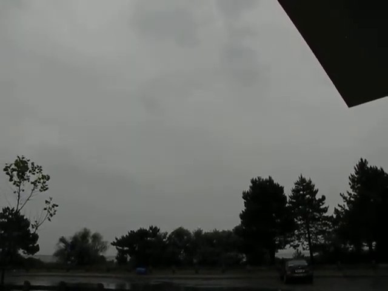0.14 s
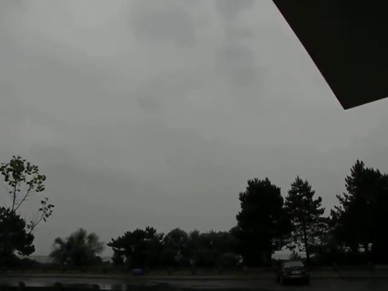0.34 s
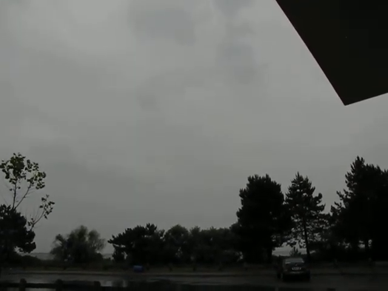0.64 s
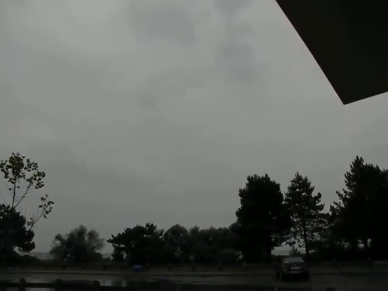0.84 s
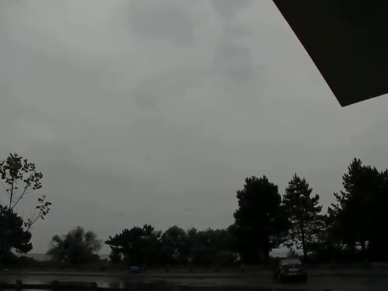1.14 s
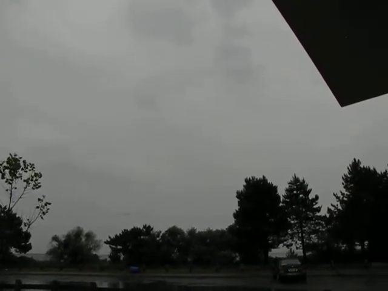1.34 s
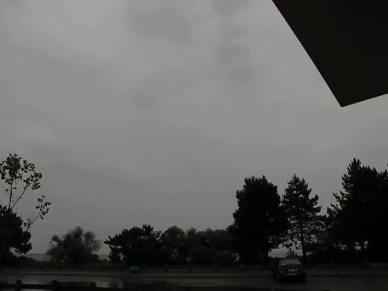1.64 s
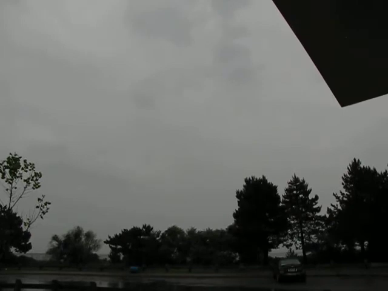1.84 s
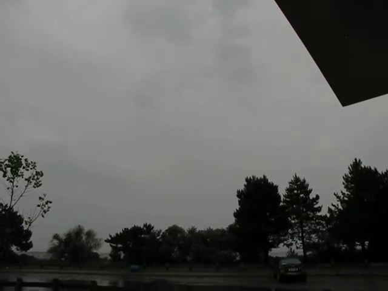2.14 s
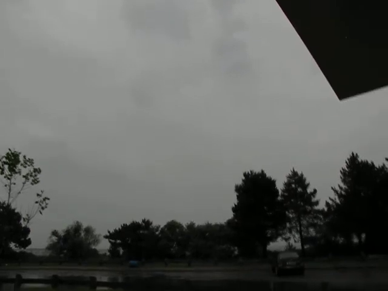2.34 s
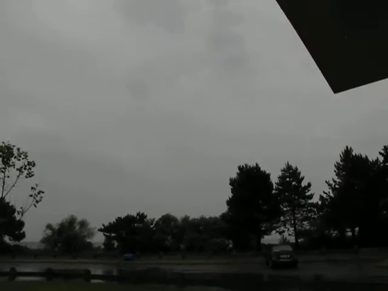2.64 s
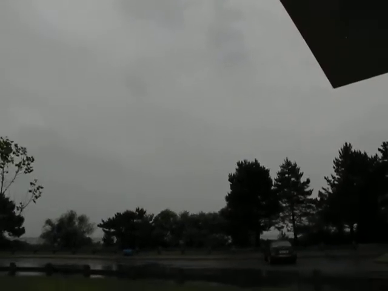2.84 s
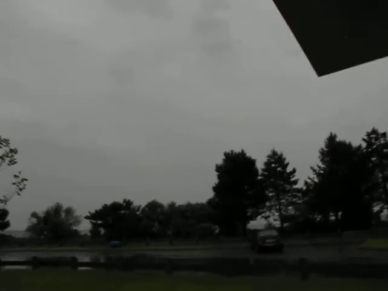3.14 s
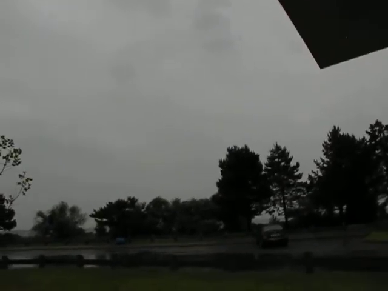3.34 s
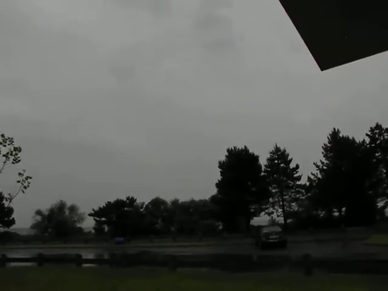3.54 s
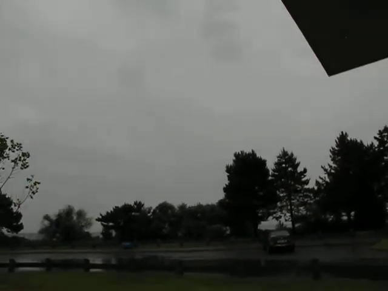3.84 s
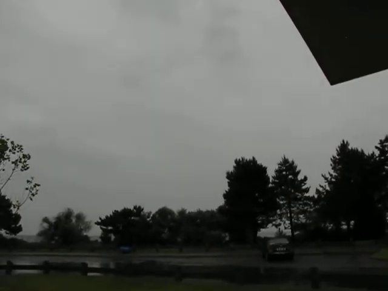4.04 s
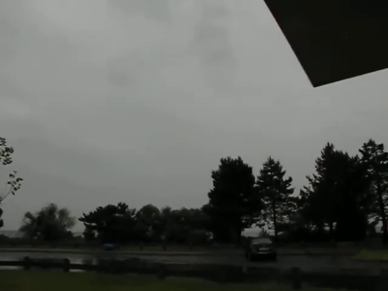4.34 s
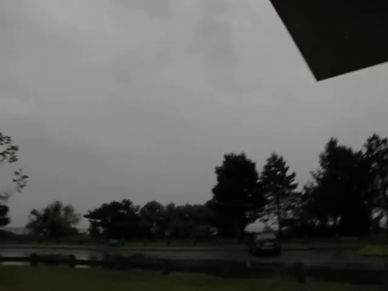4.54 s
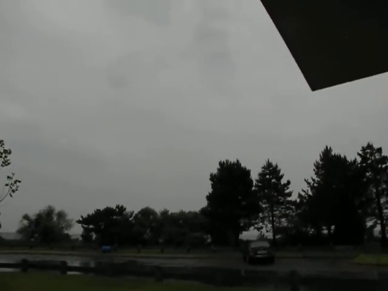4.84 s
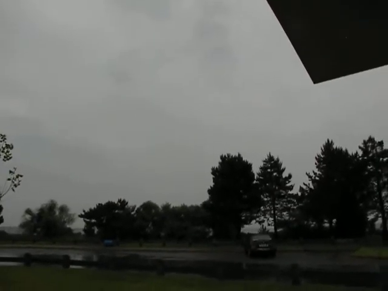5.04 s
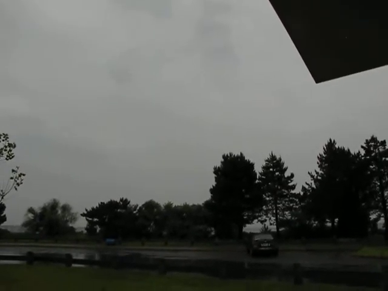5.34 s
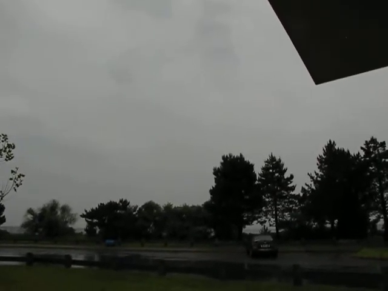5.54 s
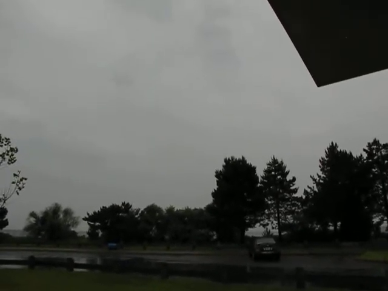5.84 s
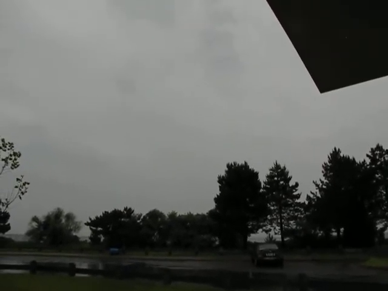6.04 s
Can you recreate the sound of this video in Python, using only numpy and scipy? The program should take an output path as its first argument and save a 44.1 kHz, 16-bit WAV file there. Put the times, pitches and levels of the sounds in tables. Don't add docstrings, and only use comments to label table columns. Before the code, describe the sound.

Throughout about six seconds, deep distant thunder rolls and wavers, booming softly beneath a porch roof, over a quiet wash and hiss of light rain with tiny drops ticking on the roof edge. At 1.0 s a single rough sparrow chirp sounds; around 1.7-2.0 s wet leaves rustle faintly. From 2.25 to 3.1 s the camera's plastic case slips in the hand: dry clicks, knocks and short finger rubs, very close, jumping left and right, strongest near 2.4 and 2.6 s. From 3.0 to 4.3 s a thrush whistles clear, gliding notes echoing off trees, with stray clicks. Finger rubbing at 4.2-4.5 s leads to a hard hollow tap at 4.6 s and a sharp left-side crack at 4.9 s, with another whistle between. Sparrows chirp around 5.1-5.4 s, a faint whistle follows, and a nearer thunder peal surges from 5.5 s, peaking near 5.95 s and starting to die.

```python
import sys
import numpy as np
from scipy import signal
from scipy.fft import rfft, irfft, next_fast_len
from scipy.io import wavfile
from scipy.ndimage import uniform_filter1d

SR = 44100
rng = np.random.default_rng(int(sys.argv[2]) if len(sys.argv) > 2 else 0)


def gain_from_db(level_db):
    decades = np.asarray(level_db, float) / 20
    return 10 ** decades


def unload_wav(signal):
    wavfile.write(
        sys.argv[1],
        SR,
        np.round(np.clip(np.atleast_2d(signal).T, -1, 1) * 32767).astype(np.int16),
    )


N = 272538

# t/s, level/dB
RAIN_LEVEL = [(0.0, -60), (2.01, -59.5), (2.46, -58.5), (3.27, -63), (4.11, -58.5), (4.25, -58),
              (4.44, -55), (4.66, -61.5), (4.77, -59.5), (4.89, -64), (5.09, -65.5), (5.3, -62.5),
              (6.18, -60)]
# f/Hz, density/(dB per Hz)
WASH_TONE = [(140, -4.5), (230, -4.5), (271, -8), (623, -7), (785, -7), (1550, -7.5), (2470, -9),
             (3200, -12.5), (3770, -13), (6000, -29), (7800, -44), (13200, -120)]
HISS_TONE = [(2650, -13), (4500, -1), (6460, -5.5), (11000, -12), (12900, -15.5), (15200, -18.5),
             (15900, -21), (16300, -60)]
# f/Hz, left-right likeness/1
PORT_LIKENESS = [(60, 0.99), (130, 0.98), (290, 0.84), (640, 0.74), (1410, 0.65), (3100, 0.06),
                 (6820, -0.27), (15000, 0.03)]
# f/Hz, left-right level/dB
PORT_LEAN = [(60, 1.0), (110, 0.5), (200, 1.0), (380, 0.5), (700, 0.0), (1290, 0.0), (2380, -0.5),
             (4400, 2.5), (8120, 2.0), (15000, 1.0)]
# t/s, peak/dB, body/dB
DROPS = [(0.2617, -47, -10), (0.5397, -50, -9), (0.7337, -50, -9), (0.854, -50, -11), (0.9155, -49, -1),
         (1.3478, -49, -9), (1.6526, -44.5, 6), (1.917, -48, -9), (2.0994, -54, -4), (3.0145, -50, -3),
         (3.1847, -53, -14), (3.3144, -51, -11), (3.4521, -56, -18), (3.497, -47.5, 7), (3.6651, -51, -10),
         (3.907, -45, -16), (4.0008, -55, 7), (4.4954, -52, 8), (4.532, -51, 16), (4.5511, -55, 6),
         (4.56, -56, 18), (5.047, -50, 7), (5.22, -50, -6), (5.6101, -46.5, -7), (5.689, -52.5, 14.5),
         (5.7608, -53, -6), (6.0122, -57, -10), (6.1389, -52, -12), (.2455, -53, -15), (.283, -52, -15),
         (.746, -51, -12), (1.084, -55, -10), (1.142, -53, -15), (1.39, -55, -12), (4.243, -50, 8),
         (4.571, -58, 12)]
# t/s, peak/dB
GUSTS = [
    (1.64, -59),
    (1.71, -46),
    (1.894, -44),
    (1.976, -43),
    (3.5, -46),
    (5.266, -46),
]
# start/s, length/s, first f/Hz, last f/Hz,
# peak/dB
THRUSH_NOTES = [(3.035, 0.07, 3387, 3180, -37), (3.098, 0.15, 2950, 2225, -44),
                (3.206, 0.13, 2190, 2165, -50), (3.538, 0.028, 2130, 2200, -48),
                (3.565, 0.17, 3080, 2375, -35), (3.726, 0.052, 2687, 2714, -46),
                (3.734, 0.062, 2320, 1960, -43.5), (4.076, 0.06, 2590, 2474, -38),
                (4.119, 0.061, 2898, 2870, -30.5), (4.203, 0.042, 2511, 2468, -33),
                (4.243, .035, 2440, 1940, -43), (4.709, 0.015, 2120, 2170, -48),
                (4.725, .03, 1990, 2400, -48), (3.091, .02, 2500, 2900, -45),
                (3.558, 0.015, 2180, 3300, -45), (4.732, .15, 3167, 2370, -34),
                (4.895, 0.037, 2900, 2500, -50), (4.902, 0.05, 2370, 1940, -50.5),
                (4.192, 0.013, 2950, 4300, -42), (4.295, .04, 3540, 4700, -48),
                (5.31, .02, 4400, 7050, -50), (5.46, 0.11, 2244, 2600, -43),
                (5.582, 0.077, 2290, 2012, -47)]
# start/s, climb/s, fall/s, top f/Hz, peak/dB
SPARROW_CHIRPS = [
    (1.008, 0.0079, 0.045, 4260, -39),
    (4.801, 0.017, 0.04, 4090, -46),
    (5.11, .012, .075, 4645, -39.5),
    (5.322, .028, 0.036, 3990, -38.5),
    (5.382, 0.024, 0.04, 3980, -40),
]
# f/Hz, t60/s
TREE_DECAY = [(1500, 0.42), (3000, 0.29), (6000, 0.15)]
# delay/s, level/dB
WALL_ECHOES = [(.011, -10), (.021, -15), (.036, -16), (.055, -15), (.1, -22), (.17, -18), (.21, -24)]
# t/s, ring peak/dB, sharpness/dB, left-right/dB
SLIPS = [(2.246, -43, 3, -2), (2.301, -23.5, -9, -3), (2.318, -45, 2.5, 2), (2.3745, -17.5, 1.5, -11),
         (2.392, -18, -12, 0), (2.546, -36, -9, -9), (2.58, -33.5, 1.5, -8), (2.6025, -12, -6, 8.5),
         (2.616, -36, 3, -16), (2.632, -34.5, -2, -12), (2.81, -23.5, 7, 6), (2.868, -20.5, -4, 5.5),
         (2.881, -19, -3, 7.5), (2.9034, -24.5, 4.5, 13), (2.92, -22.5, -2.5, 6), (2.965, -29, 1.5, 8),
         (3.046, -30, 2.5, 9.5), (3.114, -37.5, -2, 12), (3.17, -41, -6, -15), (3.739, -26.5, 4, 8),
         (3.873, -38, -2.5, 3), (4.026, -38.5, 5, -4), (4.221, -36.5, -10, -13), (4.262, -40.5, 4.5, -16),
         (4.452, -36, 0, 11), (4.6027, -20.5, -11, 1.5), (4.66, -27, -0.5, 1.5), (4.724, -34, 0, -3),
         (4.893, -30.5, 12.5, 3), (5.577, -56, 15.5, -4), (2.3952, -19, -15, -0.5), (2.583, -34, 1, -7),
         (2.6045, -13.5, -4, -4), (2.6062, -22, -7, 2), (2.609, -37, -2, 0), (2.6185, -38, 6, -8),
         (4.592, -39, -12, -1), (2.832, -36, -3, 5), (2.8703, -33, -7, 7), (2.879, -27, -7, 3),
         (2.885, -28, -6, 3), (2.956, -40, -4, 7), (4.88, -36.5, -3, 1)]
# t/s, ring f/Hz, ring t60/s, seam level/dB
GRIP = [(2.246, 1080, 0.028, 4), (2.3, 1080, 0.021, 0), (2.318, 1080, .02, 3.5), (2.3745, 900, .011, -7.5),
        (2.392, 900, 0.01, -3), (2.58, 1000, 0.013, -4), (2.6025, 1105, 0.011, -6),
        (2.81, 1090, 0.017, -2.5), (2.87, 1070, 0.023, -1), (2.9034, 1065, 0.021, 0),
        (3.046, 1060, 0.018, -1), (3.74, 1100, 0.014, -1.5), (4.24, 816, 0.023, 0), (4.6, 950, 0.028, -3),
        (4.66, 800, 0.024, -4), (4.72, 900, 0.017, 8), (4.89, 946, 0.025, 1.5), (5.57, 760, .02, -0.5)]
# f/Hz, width/Hz, level/dB
SHELL_MODES = [(900, 240, 11), (1080, 220, 6)]
PANEL_MODES = [(1440, 1440, 4.5), (2220, 970, 11.5), (3080, 1700, -12)]
SEAM_MODES = [(6040, 3050, 3.5), (7080, 710, 14), (9050, 2100, -6.5)]
# t/s, peak/dB, f/Hz, left-right/dB, swings to 60 dB down
THUMPS = [
    (2.577, -34.5, 200, -13, 3),
    (2.585, -33, 205, -15, 3),
    (2.57, -34, 290, -20, 2.5),
    (4.08, -34, 420, -16, 4.5),
    (4.6012, -10.5, 742, -9, 6),
    (4.6012, -22, 310, -16, 1.5),
    (4.661, -36, 530, -6, 4),
    (4.7235, -34.5, 210, -8, 2),
    (4.8932, -16.5, 3200, 11, 10),
    (2.3748, -26, 4900, -11, 9),
]
# t/s, peak/dB, stiff panel/dB, left-right/dB
CRACKS = [
    (2.3752, -15, -43, 2),
    (4.466, -36, -47, 14),
    (4.5995, -15.5, -34, -5),
    (4.724, -27, -39, -9),
    (4.8933, -12, -28, 15),
]
# start/s, length/s, shell/dB, seam over shell/dB
STROKES = [(2.567, 0.02, -42, -6.5), (2.586, 0.037, -37, -4), (2.618, 0.014, -41, -5),
           (2.792, 0.04, -46.5, -10), (2.865, 0.064, -50, -10), (2.934, 0.042, -44.5, -17),
           (4.223, 0.078, -43.5, -7.5), (4.276, 0.084, -47, -3), (4.39, 0.053, -52.5, 0),
           (4.441, 0.032, -47.5, 2), (4.345, 0.24, -46.5, -12.5), (4.597, 0.0083, -42, 6),
           (5.278, 0.2, -57, -21), (3.103, 0.028, -52.5, -10), (4.346, .05, -57, -4),
           (4.615, .03, -52, -16), (4.702, .06, -45.5, -13.5), (2.466, .05, -58.5, -4.5)]
# t/s, strength/dB, nearness/dB
ROLL = [(0, -34, -2), (.45, -36.5, 2.5), (.9, -35.5, 2.5), (1.17, -38.5, 1), (1.55, -36, 0),
        (2.2, -36.5, 0.5), (2.52, -39, -2), (2.75, -36.5, 0), (3.15, -39, -2.5), (3.6, -36, -1.5),
        (4.2, -32.5, -2), (4.55, -35.5, -3), (4.86, -35.5, -1), (5.05, -42.5, -1), (5.4, -38, -1),
        (5.62, -33.5, 0), (5.87, -38, -0.5), (6.18, -35.5, 1)]
# f/Hz, width/Hz, level/dB
PORCH_MODES = [(32.1, 3.64, 0), (83.4, 30.7, 0), (150.5, 37, -3), (221, 53, -10.5)]
# t/s, level/dB
PEAL = [
    (5.44, -56),
    (5.476, -60),
    (5.524, -38),
    (5.736, -47),
    (5.936, -43),
    (5.952, -35.5),
    (6.18, -51),
]
# f/Hz, density/(dB per Hz)
PEAL_TONE = [(80, -24), (125, 0.5), (250, -4), (390, -10), (520, -19.5), (700, -28.5), (1200, -56)]


def unit(x):
    return x / np.sqrt(np.mean(x ** 2) + 1e-20)


def along(points, hz):
    f, v = np.transpose(points)
    return np.interp(np.log(hz + 1), np.log(f + 1), v)


def curves(rows):
    s, *cols = np.transpose(rows)
    return [np.interp(np.arange(N) / SR, s, c) for c in cols]


def gate(start_s, length_s, fade_s):
    t = np.arange(N) / SR - start_s
    return np.clip(np.minimum(t, length_s - t) / fade_s, 0, 1)


def swell(t, rise_db_per_s, fall_db_per_s):
    return np.minimum(rise_db_per_s * t, -fall_db_per_s * t)


def sides(db):
    return gain_from_db(np.array([[db / 2], [-db / 2]]))


def span(start_s, t):
    i = round(start_s * SR)
    return slice(i, i + len(t))


def filtered(x, response):
    m = next_fast_len(x.shape[-1] + 8192)
    return irfft(rfft(x, m) * response(np.fft.rfftfreq(m, 1 / SR)), m)[..., :x.shape[-1]]


def body(modes):
    def response(f):
        return sum((-1) ** k * gain_from_db(db) * 1j * f * w / (c * c - f * f + 1j * f * w)
                   for k, (c, w, db) in enumerate(modes))
    return response


def rush(response, patchy_db, lag=0.):
    z = signal.stft(rng.standard_normal((2, N)), nperseg=512)[2]
    field = uniform_filter1d(rng.standard_normal(z.shape[1:]), 6, 0)
    field = uniform_filter1d(field, 10, 1)
    pair = signal.istft(z * gain_from_db(patchy_db * unit(field)), nperseg=512)[1][:, :N]

    def mid_side(hz):
        turn = np.arccos(np.clip(along(PORT_LIKENESS, hz), -1, 1)) / 2
        return response(hz) * [np.cos(turn), np.sin(turn)]

    def ports(hz):
        return [gain_from_db(along(PORT_LEAN, hz)) * np.exp(-2j * np.pi * hz * lag / SR), hz ** 0]
    mid, side = filtered(pair, mid_side)
    return unit(filtered(np.array([mid + side, mid - side]), ports))


def far_rain():
    rain_db, = curves(RAIN_LEVEL)
    wash_db = 12 + rain_db.mean() + 1.26 * (rain_db - rain_db.mean())
    hiss_db = 4 + rain_db
    wash = rush(lambda f: gain_from_db(along(WASH_TONE, f)), patchy_db=.7, lag=-3.)
    hiss = rush(lambda f: gain_from_db(along(HISS_TONE, f)), patchy_db=.4)
    return gain_from_db(wash_db) * wash + gain_from_db(hiss_db) * hiss


def near_drops():
    ticks, t = np.zeros((2, 2, N + 400)), np.arange(400) / SR
    for s, db, body_db in DROPS:
        splash = rng.standard_normal((2, len(t))) * gain_from_db(-60 * t / 0.0055) * sides(1.1)
        gains = gain_from_db(db + 10.0 + np.array([0, body_db]))
        ticks[..., span(s, t)] += gains[:, None, None] * splash
    bright = filtered(ticks[0], lambda f: body([(12000, 6000, 0)])(f) / (1 + (f / 15500) ** 16))
    dull = filtered(ticks[1], body([(5560, 2500, 0)]))
    return (bright + dull)[:, :N]


def leaves():
    rustle = rush(lambda f: gain_from_db(along(WASH_TONE, f)) * f / (f + 900) / (1 + (f / 3000) ** 2), patchy_db=1.5)
    t = np.arange(N) / SR
    return sum(gain_from_db(db + swell(t - s, rise_db_per_s=350, fall_db_per_s=248)) for s, db in GUSTS) * rustle


def trees(x, wet_db, wall_db, lag, pan_db):
    hz, t, z = signal.stft(rng.standard_normal((2, SR // 2)), SR, nperseg=256)
    tail = signal.istft(z * gain_from_db(-60 * t / along(TREE_DECAY, hz)[:, None]), SR, nperseg=256)[1]
    path = gain_from_db(wet_db) * np.pad(tail / np.linalg.norm(tail[0]), ((0, 0), (300, 0)))
    for s, db in WALL_ECHOES:
        path[[0, 1], round(s * SR) + rng.integers(0, 12, 2)] += gain_from_db(db + wall_db)
    path[[0, 1], [max(-lag, 0), max(lag, 0)]] += sides(pan_db)[:, 0]
    return signal.fftconvolve(x[None], path, axes=1)[:, :N]


def sing(notes, glide_s, flutter, rasp_db):
    shake, rasp = (unit(uniform_filter1d(rng.standard_normal(N), size)) for size in (120, 70))
    out = np.zeros(N)
    for start_s, length_s, hz, db in notes:
        hz = uniform_filter1d(hz, round(glide_s * SR)) * (1 + flutter * shake)
        tone = np.sin(2 * np.pi * np.cumsum(hz) / SR)
        out += gain_from_db(db + 4.0) * gate(start_s, length_s, 0.0024) * tone
    return out * gain_from_db(rasp_db * rasp)


def sparrow_chirps():
    climb_from, floor_hz, fall_tau_s = .74, 2617, 0.026
    peak_s, rise_db, fade_db_per_s = 0.0088, 9, 273
    for s, climb, fall, top, db in SPARROW_CHIRPS:
        t = np.arange(N) / SR - s - climb
        up_hz = top * (1 + (1 - climb_from) * t.clip(-climb) / climb)
        down_hz = floor_hz + (top - floor_hz) * np.exp(-t.clip(0) / fall_tau_s)
        level_db = db + swell(t - peak_s, rise_db / (climb + peak_s), fade_db_per_s)
        yield s, climb + fall, np.where(t < 0, up_hz, down_hz), level_db


def thrush_notes():
    settle, settle_bend, quickest_glide_s = .3, 1.382, .032
    rise_s, rise_db, fade_db_per_s = 0.01, 11.5, 71
    for s, length, first, last, db in THRUSH_NOTES:
        t = np.arange(N) / SR - s
        glide_s = max(settle * length, quickest_glide_s)
        hz = last + (first - last) * np.exp(-(t.clip(0) / glide_s) ** settle_bend)
        yield s, length, hz, db + swell(t - rise_s, rise_db / rise_s, fade_db_per_s)


def birds():
    thrush = sing(thrush_notes(), glide_s=.008, flutter=.0035, rasp_db=2.2)
    sparrows = sing(sparrow_chirps(), glide_s=.008, flutter=.025, rasp_db=5.5)
    out = trees(thrush, wet_db=-7, wall_db=0.6, lag=-5, pan_db=3)
    return out + gain_from_db(-4.0) * trees(sparrows, wet_db=-4.5, wall_db=4.5, lag=4, pan_db=12.5)


def finger():
    uneven = unit(uniform_filter1d(rng.standard_normal(N), 150))
    grains = rng.standard_normal((2, 2, N)) * gain_from_db(2.2 * uneven)
    seams = body([(2300, 1500, -7), (4500, 2500, -4), (7200, 3500, 0)])
    shell = unit(filtered(grains[0], lambda f: body(SHELL_MODES)(f) / (1 + (f / 1500) ** 2)))
    seam = unit(filtered(grains[1], lambda f: seams(f) / (1 + (f / 9500) ** 4)))
    out = np.zeros((2, N))
    for s, length, db, seam_db in STROKES:
        start = gate(s, 2 * length, 0.38 * length)
        stop = gate(s - length, 2 * length, 0.096 * length)
        rub = gain_from_db(1.5) * sides(-3.5) * shell + gain_from_db(seam_db + 8.0) * sides(-4.0) * seam
        out += start * stop * gain_from_db(db) * rub
    return out


def snap(jolt, modes, corner_hz):
    x = filtered(jolt, lambda f: body(modes)(f) * f / (1 + 1j * f / corner_hz) ** 3)
    return x / np.abs(x).max(axis=1, keepdims=True)


def slips():
    out, t = np.zeros((2, N + 2000)), np.arange(2000) / SR
    grip_s, *grip = np.transpose(GRIP)
    for s, ring_db, sharp_db, pan_db in SLIPS:
        hz, t60_s, seam_db = (np.interp(s, grip_s, column) for column in grip)
        snap_db = ring_db + sharp_db
        edge_db = min(ring_db + 1.83 * sharp_db - 9, snap_db - 1.5) + seam_db
        jolt_t60_s = np.where([[pan_db > 0], [pan_db <= 0]], .0015, .006)
        jolt = rng.standard_normal((2, len(t))) * gain_from_db(-60 * t / jolt_t60_s)
        settling = uniform_filter1d(rng.standard_normal((2, len(t))), size=7)
        jolt += gain_from_db(-27 - 60 * t / 0.069) * settling
        modes = np.sin(2 * np.pi * hz * t - [[1.1], [0]])
        modes = modes + 0.73 * np.sin(2 * np.pi * hz * rng.uniform(0.83, 1.5, (2, 1)) * t)
        ring = gain_from_db(ring_db + 5.5 - 60 * t / t60_s) * (1 - np.exp(-t / 0.00082))
        slip = ring * sides(0.5 * pan_db - 6.5) * modes
        slip += gain_from_db(snap_db + 9.0) * sides(pan_db) * snap(jolt, PANEL_MODES, corner_hz=4400)
        slip += gain_from_db(edge_db + 11.0) * sides(pan_db) * snap(jolt, SEAM_MODES, corner_hz=6500)
        out[:, span(s, t)] += slip
    return out[:, :N]


def thumps():
    out, t = np.zeros((2, N + 2000)), np.arange(2000) / SR
    for s, db, hz, pan_db, swings in THUMPS:
        decay = gain_from_db(db + 9.5 - 60 * t * hz / swings)
        out[:, span(s, t)] -= decay * sides(pan_db) * np.sin(2 * np.pi * hz * t)
    return out[:, :N]


def cracks():
    out, t = np.zeros((2, 2, N)), np.arange(300) / SR
    for s, db, panel_db, pan_db in CRACKS:
        splinter = gain_from_db(-60 * t / 0.0086) * sides(pan_db) * rng.standard_normal((2, len(t)))
        out[..., span(s, t)] = gain_from_db([[[db - .7]], [[panel_db + 22]]]) * splinter
    bright = filtered(out[0], lambda f: body([(11500, 5000, 0)])(f) / (1 + (f / 15000) ** 6))
    return bright + filtered(out[1], lambda f: body([(3100, 2200, 0)])(f) ** 2)


def held(x, span_s):
    evening = 0.48
    power = np.abs(uniform_filter1d((x ** 2).mean(axis=0), round(span_s * SR))) + 1e-3
    return unit(x / power ** (evening / 2))


def far_roll():
    roll_db, near_db = curves(ROLL)
    deep = held(rush(body(PORCH_MODES[:1]), patchy_db=2.0), span_s=0.054)
    boom = held(rush(lambda f: body(PORCH_MODES[1:2])(f) ** 2, patchy_db=-0.5), span_s=0.12)
    grumble = rush(lambda f: body(PORCH_MODES[2:])(f) ** 2, patchy_db=1.5)
    out = gain_from_db(roll_db - 1.5 - near_db) * deep
    out += gain_from_db(roll_db - 3.5 + 0.62 * near_db) * boom
    return out + gain_from_db(roll_db - 15 + 1.96 * near_db) * grumble


def near_peal():
    def ground(f):
        return gain_from_db(along(PEAL_TONE, f)) / (1 - 0.57 * np.exp(-2j * np.pi * f / 127))
    level = gain_from_db(curves(PEAL)[0] + 2.5) * gate(PEAL[0][0], 2 * N, 0.056)
    return level * held(rush(ground, patchy_db=3.0), span_s=0.1)


def scene():
    background = far_rain() + near_drops() + leaves() + birds()
    handling = finger() + slips() + thumps() + cracks()
    return background + handling + far_roll() + near_peal()


def roll_off(x):
    return signal.sosfilt(signal.butter(12, 15850, fs=SR, output="sos"), x)


def record(dry):
    mix = np.clip(dry, -1, 1)
    return roll_off(mix)


dry = scene()
out = record(dry)
unload_wav(out)
```